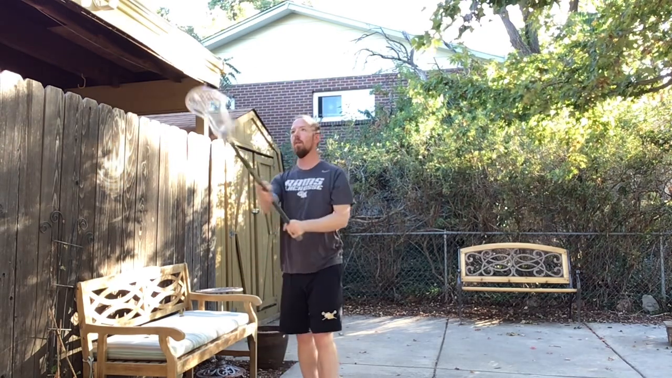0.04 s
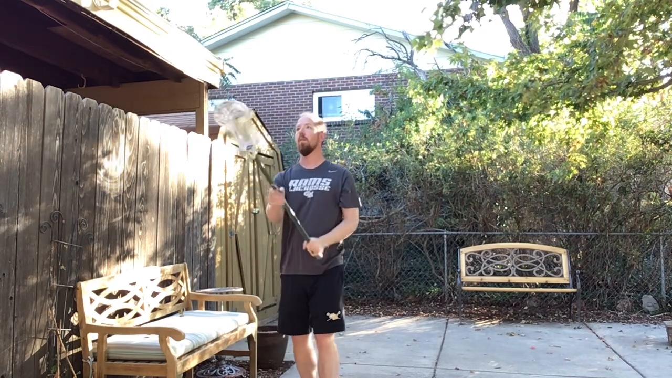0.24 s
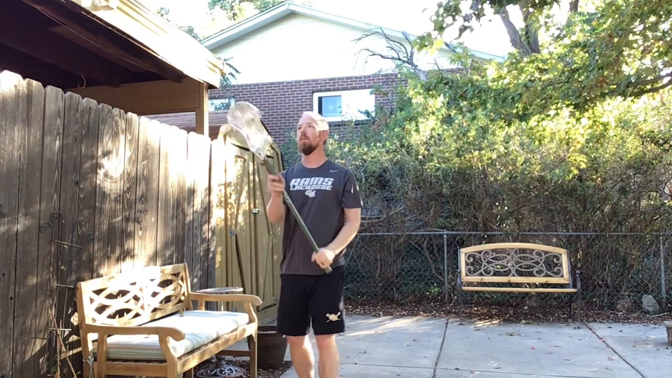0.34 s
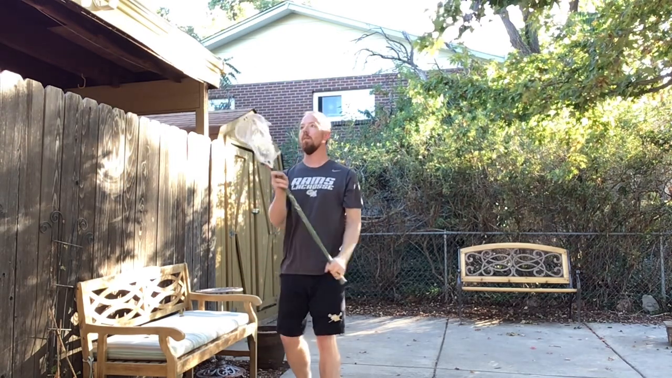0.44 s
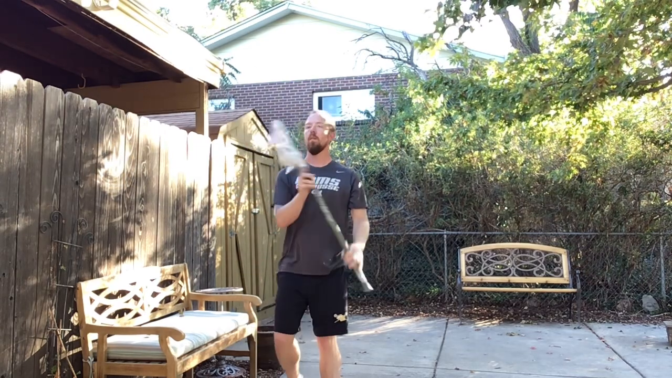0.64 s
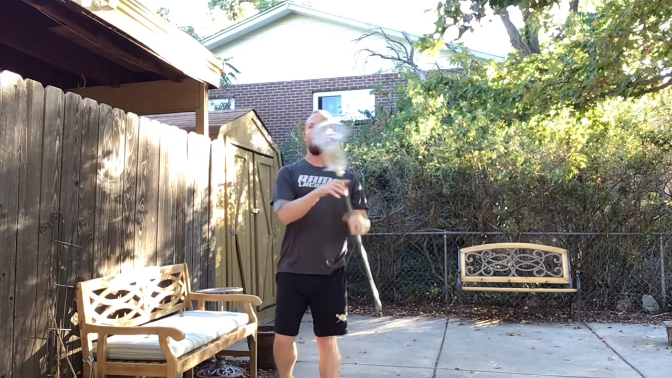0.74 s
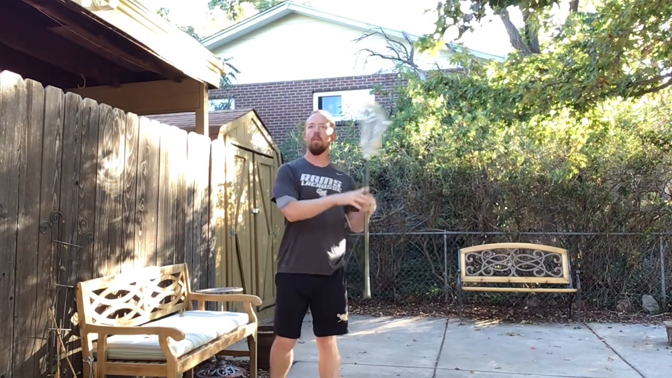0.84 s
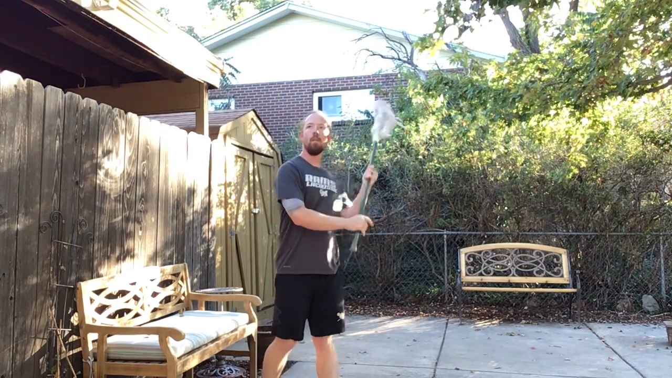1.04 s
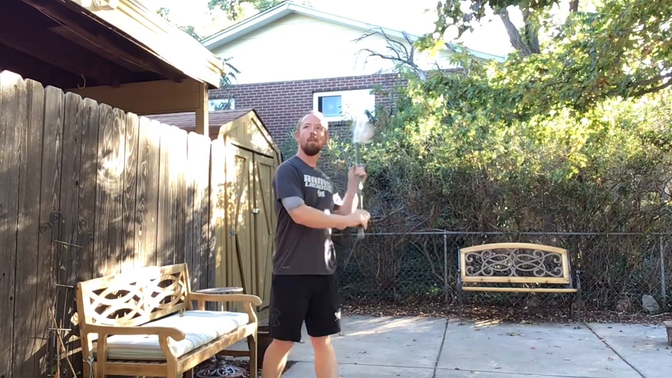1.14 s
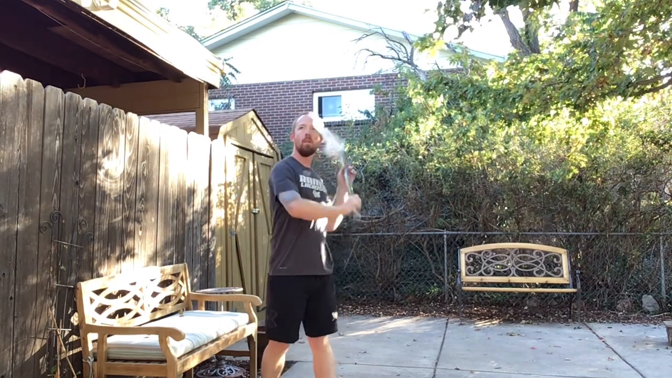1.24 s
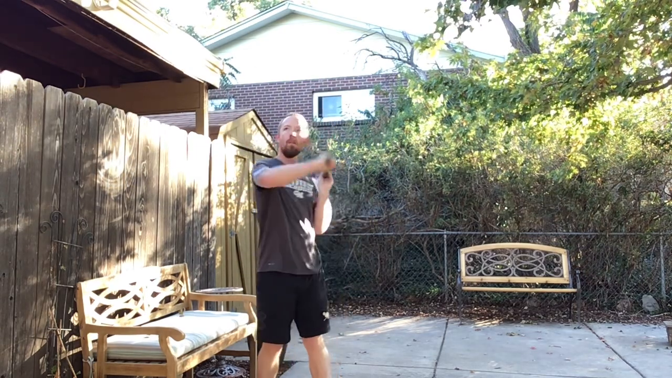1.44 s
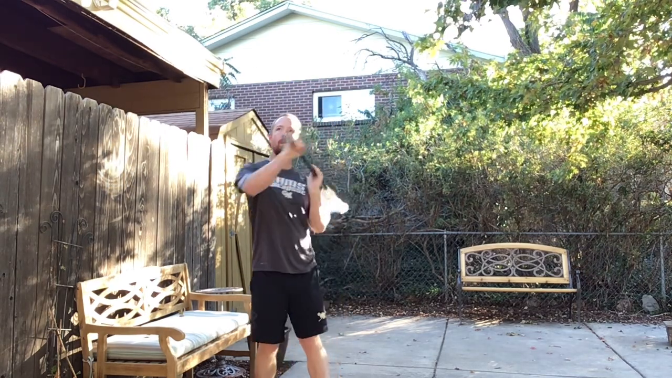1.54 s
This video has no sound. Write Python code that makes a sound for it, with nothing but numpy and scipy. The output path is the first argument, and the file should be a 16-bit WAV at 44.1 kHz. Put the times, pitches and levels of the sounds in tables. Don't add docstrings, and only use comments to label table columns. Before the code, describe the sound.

A rubber ball lands in a stick's mesh pocket with a crisp snap and low thump, briefly echoing off fence and slab; then faint hand ticks over a quiet motor hum, one distant microphone, mono.

```python
import sys
import numpy as np
from scipy import signal
from scipy.io import wavfile

SR = 44100
rng = np.random.default_rng(int(sys.argv[2]) if len(sys.argv) > 2 else 0)


def gain_from_decibels(decibels):
    exponent = np.asarray(decibels, float) / 20
    return 10 ** exponent


def wrap_up_sound(samples):
    columns = np.atleast_2d(samples).T
    tamed = np.clip(columns, -1, 1)
    steps = np.round(tamed * 32767).astype(np.int16)
    wavfile.write(sys.argv[1], SR, steps)


N = 70560

# start in seconds, peak level in dB, loss of the low rings in dB.
STRING_SNAPS = [(.2246, -24, -1), (.2263, -29, 7), (.2278, -33, 8), (.2281, -34, 8), (.2301, -37, 8),
                (.2330, -40, 14)]
# frequency in Hz, level in dB, T60 in seconds.
HEAD_MODES = [(1140, -23, 0.0021), (2200, -14, 0.0015), (4600, -12, .002), (6760, -3, .002),
              (8740, -2, 0.0015), (10400, 1, 0.0018), (14100, -14, 0.0024)]
# centre in seconds, peak level in dB (positive: opposite
# polarity), pitch in Hz, length in cycles.
POCKET_THUMPS = [(0.226, -32, 414, 0.3), (0.2298, -27, 270, 0.26), (0.2351, -16.5, 248.4, .55),
                 (.2420, -24, 189, 0.43), (0.2457, 22, 223, 0.56), (.2480, -36, 220, 0.26),
                 (0.2567, -27.5, 251, 0.3), (.2645, 25, 216, 0.85), (.2770, -38, 295, 1.8),
                 (.2860, -40.5, 140, 1.5), (0.2976, 31, 242, 1.35), (.3055, 38, 200, 0.22),
                 (0.3243, -38.5, 169, 1.35), (.345, -45, 232, 4.5)]
# centre in seconds, peak level in dB, pitch in Hz, length in cycles.
FOOTFALLS = [(0.254, -48, 62, 1.4), (0.351, -50, 68, 1.3), (0.585, -44, 148, 0.27),
             (0.781, -53.5, 167, 1.7), (1.217, -44.5, 97, 0.78), (1.549, -47, 127, 1.26)]
# start in seconds, peak level in dB, centre in Hz, length in seconds.
CONTACT_TICKS = [(.9020, -49.5, 4430, 0.0016), (.9048, -60, 7000, .0008), (.9075, -64, 9000, 0.00086),
                 (0.9111, -47.5, 8000, .001), (0.9148, -45.5, 8000, 0.00041), (0.917, -56, 9500, .001),
                 (.9190, -56, 6000, 0.00091), (0.5765, -56, 6500, 0.0012), (.5790, -51, 6500, 0.0012),
                 (0.5798, -53, 2380, 0.0038), (0.5827, -58, 1810, 0.0027)]
# start in seconds, rms level in dB, centre in Hz, T60 in seconds.
FRICTION_RUSTLES = [
    (0.2264, -49.5, 9600, 0.2),
    (.2250, -52.5, 4000, 0.071),
    (0.225, -49.5, 1110, 0.11),
    (.575, -59.5, 2760, 0.11),
    (0.578, -53.5, 950, 0.078),
    (0.576, -66, 7360, 0.17),
    (0.904, -63, 4530, 0.082),
    (0.912, -65.5, 9100, 0.16),
]
# centre in seconds, rms level in dB, centre in Hz, half length in seconds.
STICK_SWISHES = [
    (0.17, -81, 11100, 0.025),
    (.42, -75.5, 12400, 0.03),
    (0.67, -80.5, 13000, 0.039),
    (.765, -75.5, 12600, .04),
]
# time in seconds, frequency in Hz.
MOTOR_PITCH = [(0.0, 223.3), (1.568, 225.4), (1.6, 227)]
# time in seconds, upper partial level in dB, lower partial level in dB.
MOTOR_LOAD = [(0, -52.5, -59.5), (.1, -55, -55), (.2, -54, -62), (.45, -57.5, -54), (.63, -57, -62.5),
              (.72, -62, -51), (.79, -64, -58), (.86, -61.5, -53), (1.0, -66.5, -60), (1.09, -71.5, -54.5),
              (1.15, -68.5, -67.5), (1.35, -60, -55), (1.47, -61.5, -77), (1.6, -66.5, -52)]
# frequency in Hz, density in dB per Hz.
OUTDOOR_SPECTRUM = [(45, -3.5), (118, -3.5), (394, -18.5), (900, -20.5), (1900, -32.5), (3200, -32.5),
                    (9200, -41.5), (14800, -47.5)]


def rms_one(x):
    return x / np.sqrt(np.mean(x ** 2) + 1e-20)


def drift(rate_hz):
    pole = np.exp(-2 * np.pi * rate_hz / SR)
    slow = signal.lfilter([1], [1, -2 * pole, pole * pole], rng.standard_normal(N + SR))
    return rms_one(slow[SR:])


def band(low_hz, high_hz):
    edges = [low_hz, min(high_hz, SR * 0.45)]
    sos = signal.butter(2, edges, "band", fs=SR, output="sos")
    return rms_one(signal.sosfilt(sos, rng.standard_normal(N + SR))[SR:])


def dying(start, t60, rise):
    t = np.maximum(np.arange(N) / SR - start, 0)
    return (1 - np.exp(-t / rise)) * gain_from_decibels(-60 * t / t60)


def swell(centre, half):
    t = np.arange(N) / SR
    return np.exp(-0.5 * ((t - centre) / half) ** 2)


def pressure_pulls(events):
    t = np.arange(N) / SR
    out = np.zeros(N)
    for s, db, hz, cycles in events:
        peak = np.sign(db) * gain_from_decibels(-abs(db))
        out += peak * np.cos(2 * np.pi * hz * (t - s)) * swell(s, cycles / hz)
    return out


def string_snaps():
    s, db, loss_db = np.transpose(STRING_SNAPS)
    out = np.zeros(N)
    for hz, mode_db, t60 in HEAD_MODES:
        strike_db = db + mode_db - loss_db * (hz < 8000) + rng.normal(0, 3.9, len(s))
        impulses = np.full(N, 1e-18)
        impulses[(s * SR).astype(int)] = gain_from_decibels(strike_db)
        radius, angle = gain_from_decibels(-60 / (t60 * SR)), 2 * np.pi * hz / SR
        resonator = [1, -2 * radius * np.cos(angle), radius * radius]
        out += signal.lfilter([np.sin(angle)], resonator, impulses)
    return 0.55 * out


def pocket_thump():
    yard_tail = gain_from_decibels(-35) * band(111, 306) * dying(0.2245, t60=0.38, rise=0.0096)
    return pressure_pulls(POCKET_THUMPS) + yard_tail


def contact_ticks():
    out = np.zeros(N)
    for s, db, hz, length in CONTACT_TICKS:
        out += gain_from_decibels(db) * band(hz * 0.55, hz * 1.45) * dying(s - 0.0002, 3.4 * length, 0.0001)
    return out


def friction_rustle():
    out = np.zeros(N)
    for s, db, hz, t60 in FRICTION_RUSTLES:
        out += gain_from_decibels(db) * band(hz * 0.41, hz * 1.81) * dying(s, t60, 0.001)
    grain = gain_from_decibels(1.2 * drift(400))
    return grain * out


def stick_swish():
    out = np.zeros(N)
    for s, db, hz, half in STICK_SWISHES:
        out += gain_from_decibels(db) * band(hz * 0.68, hz * 1.4) * swell(s, half)
    return out


def mesh_whistle():
    centre_hz = 13500
    return gain_from_decibels(-90) * band(centre_hz - 350, centre_hz + 350) * swell(0.765, 0.03)


def footfalls():
    return pressure_pulls(FOOTFALLS)


def motor():
    t = np.arange(N) / SR
    s, upper_db, lower_db = np.transpose(MOTOR_LOAD)
    wobble_db, wobble_hz = 0.5, 13.6
    pitch_hz = np.interp(t, *np.transpose(MOTOR_PITCH)) + 1.21 * drift(3.8)
    phase = 2 * np.pi * np.cumsum(pitch_hz) / SR
    upper_level = np.interp(t, s, upper_db) + 1.1 * wobble_db * drift(wobble_hz)
    lower_level = np.interp(t, s, lower_db) + wobble_db * drift(wobble_hz)
    partials = gain_from_decibels(upper_level) * np.sin(phase) + gain_from_decibels(lower_level) * np.sin(phase / 2)
    return np.sqrt(2) * partials


def outdoors():
    hz, density_db = np.transpose(OUTDOOR_SPECTRUM)
    edges = 36 * 2 ** np.arange(0, 9.1, 0.5)
    air = np.zeros(N)
    for low, high in zip(edges, edges[1:]):
        level_db = np.interp(np.log(low * high) / 2, np.log(hz), density_db)
        patchy_db = level_db + 0.6 * drift(5.6)
        air += np.sqrt(high - low) * gain_from_decibels(patchy_db) * band(low, high)
    rumble = gain_from_decibels(-68.5 + 4.2 * drift(7.0)) * band(50, 184)
    far = gain_from_decibels(-58) * rms_one(air) + rumble
    far = signal.sosfilt(signal.butter(8, 15300, fs=SR, output="sos"), far)
    return signal.sosfilt(signal.butter(8, 46, "high", fs=SR, output="sos"), far)


def scene():
    catch = string_snaps() + pocket_thump()
    handling = contact_ticks() + friction_rustle()
    swings = stick_swish() + mesh_whistle()
    background = footfalls() + motor() + outdoors()
    return (catch + handling + swings + background)[None]


def top_cut(x):
    return signal.sosfilt(signal.butter(12, 16520, fs=SR, output="sos"), x)


def record(dry):
    x = signal.sosfilt(signal.cheby2(12, 60, 16700, fs=SR, output="sos"), dry)
    x = signal.sosfilt(signal.butter(2, 30, "high", fs=SR, output="sos"), x)
    return top_cut(x)


dry = scene()
out = record(dry)
wrap_up_sound(out)
```